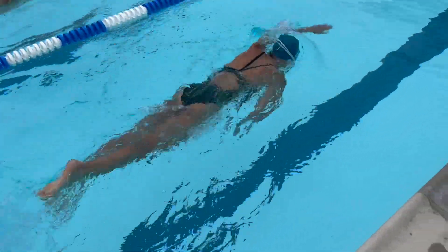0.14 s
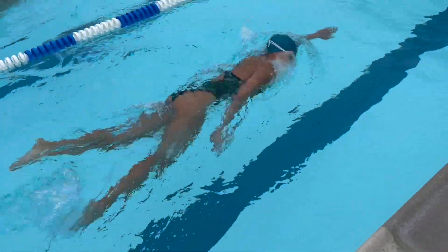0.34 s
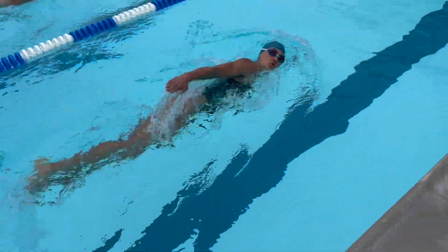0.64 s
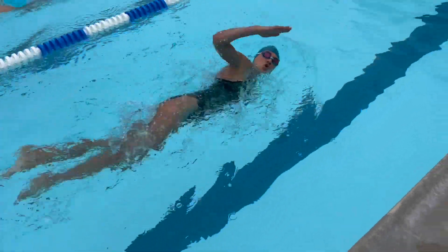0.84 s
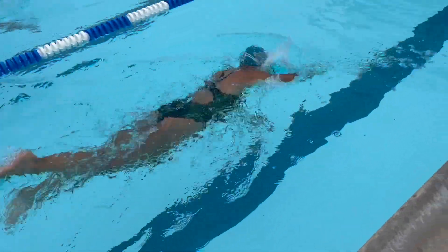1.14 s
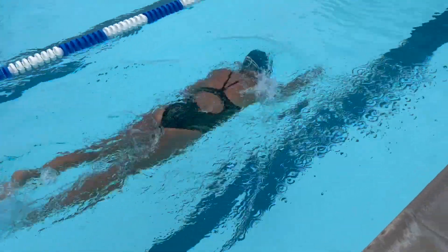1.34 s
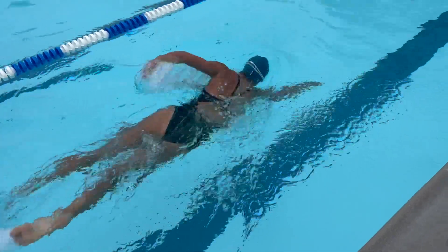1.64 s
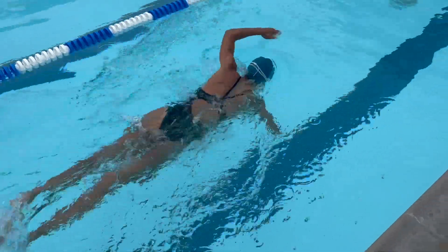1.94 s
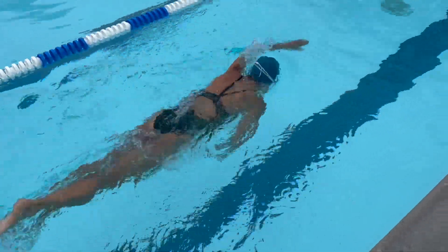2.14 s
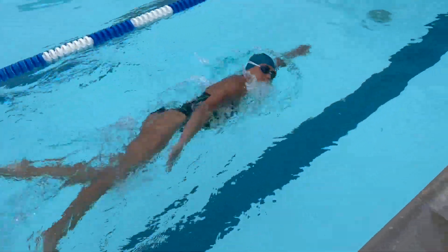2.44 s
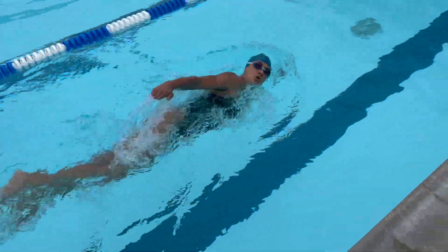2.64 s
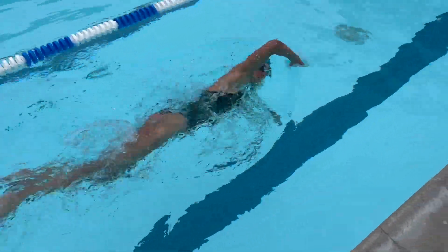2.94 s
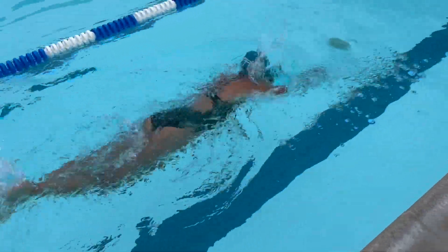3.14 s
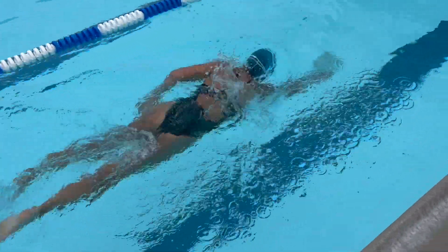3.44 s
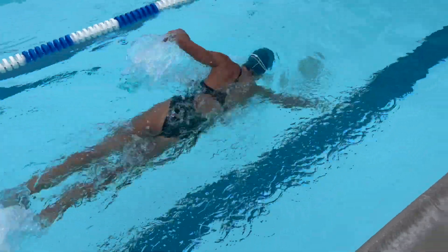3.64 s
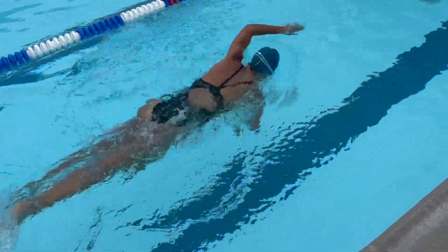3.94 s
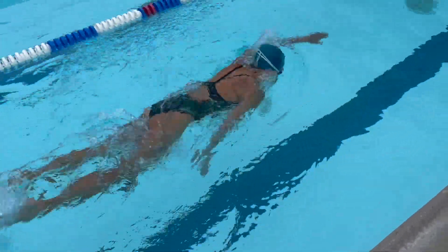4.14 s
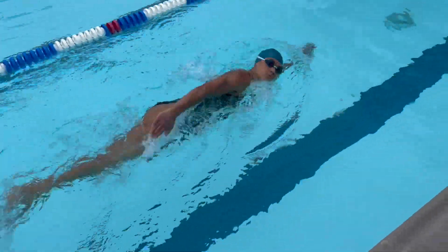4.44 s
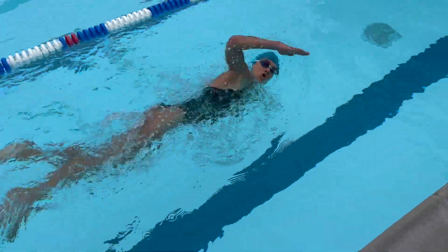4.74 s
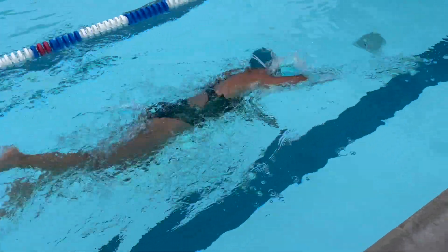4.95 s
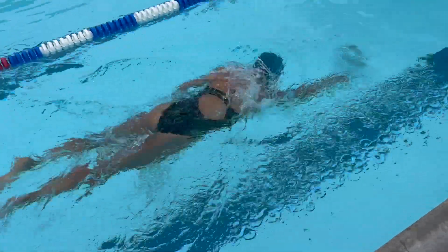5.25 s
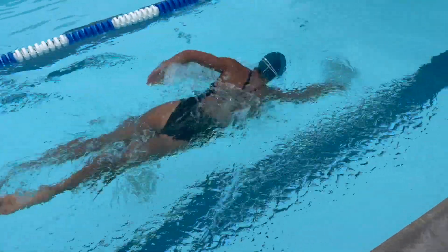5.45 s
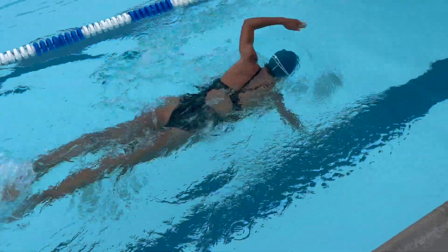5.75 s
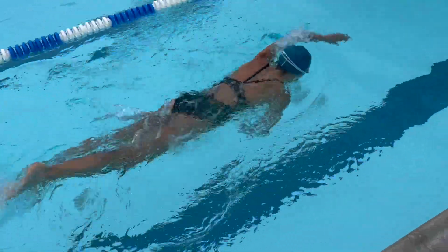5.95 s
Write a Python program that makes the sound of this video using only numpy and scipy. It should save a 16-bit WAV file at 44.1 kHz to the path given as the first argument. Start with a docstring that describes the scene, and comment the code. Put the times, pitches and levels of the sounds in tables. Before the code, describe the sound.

A swimmer does front crawl close by in an outdoor pool, water gurgling, splashing and plunking while a low propeller drone fades away.

```python
"""Outdoor pool, from the deck: a swimmer does front crawl.
Hands slap (noise bursts); kicks and arm strokes churn air into clouds of ringing bubbles, gulps and plunks.
Drops tick and ring on the water, and spray fizzes above.
A low engine drone, like a propeller plane (summed orders), fades into the distance over an outdoor rumble."""
import sys
import numpy as np
from scipy import signal
from scipy.fft import rfft, irfft, next_fast_len
from scipy.io import wavfile
from scipy.ndimage import uniform_filter1d, map_coordinates

SR = 44100
rng = np.random.default_rng(int(sys.argv[2]) if len(sys.argv) > 2 else 0)


def generate_wav(signal):
    """Clip the signal to [-1, 1] and save it as 16-bit WAV at the path in sys.argv[1]."""
    frames = np.transpose(np.atleast_2d(signal))
    scaled = np.clip(frames, -1, 1) * 32767
    pcm = np.round(scaled).astype(np.int16)
    wavfile.write(sys.argv[1], SR, pcm)


N = 268128


def amp(db):
    """Decibels to gain."""
    return 10 ** (np.asarray(db) / 20)


def unit(x):
    """Scale to rms 1."""
    return x / np.sqrt(np.mean(x ** 2) + 1e-20)


def curves(rows):
    """One value per sample for each column after the time."""
    s, *columns = np.transpose(rows)
    return [np.interp(np.arange(N) / SR, s, column) for column in columns]


def wobble(rate_hz):
    """Smooth random curve, rate_hz knots a second."""
    knots = rng.standard_normal(int(N * rate_hz / SR) + 4)
    return map_coordinates(knots, [np.arange(N) * rate_hz / SR])


def filtered(x, response):
    """x times a response of frequency."""
    m = next_fast_len(N + 8192)
    spectrum = rfft(x, m) * response(np.fft.rfftfreq(m, 1 / SR))
    return irfft(spectrum, m)[..., :N]


def coloured(x, points):
    """x through a spectrum of (f/Hz, level/dB) points, interpolated in log frequency."""
    f, db = np.transpose(points)
    return filtered(x, lambda hz: amp(np.interp(np.log(hz + 1), np.log(f), db)))


def one_pole(x, cutoff_hz):
    """One-pole lowpass, not normalised in gain."""
    return signal.lfilter([1], [1, -np.exp(-2 * np.pi * cutoff_hz / SR)], x)


def add(track, s, sound):
    """Mix a sound into a track at s seconds."""
    start = max(0, round(s * SR))
    track[start:start + len(sound)] += sound[:max(0, N - start)]


# stereo width: f/Hz, side gain/dB
SIDE_WIDTH = [(60, -11.5), (140, -7.5), (350, -11.5), (700, -5), (1100, -3), (1500, 6), (1850, -13),
              (2800, -2), (4500, -6.5), (5600, -1.5), (6800, -14), (13000, -95)]


def stereo(mid, side):
    """Left and right from mid and side; the width depends on frequency."""
    side = coloured(side, SIDE_WIDTH)
    return np.array([mid + side, mid - side])


def poolside(x, decay_s=0.014):
    """The moving surface scatters a sound sideways, by a new path every fifth of a second."""
    t = np.arange(SR // 20) / SR
    side, size = np.zeros(N), SR // 5
    for start in range(0, N, size):
        path = rng.standard_normal(len(t)) * amp(-60 * t / decay_s)
        path = path / np.linalg.norm(path)
        add(side, start / SR, signal.fftconvolve(x[start:start + size], path))
    return stereo(x, side)


def scene():
    """The swimmer in front, the drone and rumble all around."""
    return strokes() + slaps() + gulps() + drops() + plunks() + drone() + rumble()


# bubble and spray spectra: f/Hz, relative level/dB (per Hz)
CHURN_SPECTRUM = [(90, -19), (170, 4.5), (250, 0), (340, 0.5), (480, -2.5), (750, -5.5), (1000, -28),
                  (2000, -51)]
SPLASH_SPECTRUM = [(400, -6.5), (750, -4.5), (1080, 0.5), (1600, -5.5), (2050, -4.5), (2800, -9.5),
                   (3600, -18), (6000, -64)]
SPRAY_SPECTRUM = [(1500, -3), (2800, -4), (3500, 0.5), (4700, 0.5), (5600, -4), (7000, -0.5), (9000, -2.5),
                  (11500, -1), (13500, -5), (15600, -20)]


def strokes():
    """Large bubbles gurgle under the kicks, small ones splash, and droplets fizz above them."""
    churn_db, splash_db, spray_db = stirring()
    slosh = wobble(35)  # sheets of water break unevenly
    large = bubbles(rate_hz=360, low_hz=200, high_hz=950, cycles=22, spread_db=2.4, rise=.08, clump_db=3)
    small = bubbles(rate_hz=1100, low_hz=700, high_hz=3400, cycles=38, spread_db=2.6, rise=.015, clump_db=3)
    tiny = bubbles(rate_hz=1900, low_hz=2600, high_hz=15000, cycles=34, spread_db=3.8, rise=.025, clump_db=3)
    churn = froth(large, CHURN_SPECTRUM, wash_db=-1.5)
    splash = patchy(froth(small, SPLASH_SPECTRUM, wash_db=-2), depth_db=2.2)
    spray = froth(tiny, SPRAY_SPECTRUM, wash_db=2)
    churn = churn * amp(churn_db + slosh)
    splash = splash * amp(splash_db + 0.35 * slosh)
    spray = spray * amp(spray_db + 1.4 * slosh + 0.88 * wobble(500))
    return churn + splash + spray


# flutter kick: t/s, vigour/dB
KICK_VIGOUR = [(0, 2), (.13, -0.5), (.45, 2), (.95, -1), (1.6, 2.24), (2.0, 1.5), (2.16, 1), (2.9, 1),
               (3.4, 2.5), (4.0, 1), (4.4, 0.5), (4.8, 1.66), (5.2, 3), (5.32, 1.1), (5.6, 3), (5.9, 1.5),
               (5.99, -1), (6.08, 2)]
# wake kept boiling by the kick, before vigour: churn level/dB, splash level/dB, spray level/dB
WAKE_LEVELS = (-32.5, -38, -46)
# arm plunges in and drags air under:
# t/s, splash gain/dB, rise/s, hold/s, fall/s, extra churn/dB, extra spray/dB
ARM_ENTRIES = [(.26, 1.5, 0.05, 0.088, 0.1, 1, -1.5), (1.1, 1.5, 0.22, 0.15, 0.099, -4.5, -4),
               (2.3, 2.5, 0.049, 0.16, 0.11, -3, -3.5), (3.05, 0.5, 0.064, 0.15, 0.14, -3, -0.5),
               (4.16, -1.5, 0.11, 0.12, 0.23, 1.5, 2.5), (5.065, 4.5, 0.079, 0.032, 0.02, -3, -1),
               (6.045, 1, 0.026, .04, .2, -2, -6)]
# arm pushes out past the hip and sheds water: same columns
ARM_EXITS = [(.58, -3, 0.058, 0.23, 0.11, 4, -1.5), (1.74, -0.5, 0.05, 0.035, 0.29, -2, 2),
             (2.6, -2.5, 0.05, 0.12, 0.36, -21, -1), (3.62, 3, 0.039, 0.17, 0.22, -4.5, -0.5),
             (4.55, -7, 0.083, 0.1, 0.33, 2, 1.5), (5.495, -3, 0.039, 0.37, 0.11, -2.5, 1)]
# base surge levels: churn level/dB, splash level/dB, spray level/dB
ENTRY_LEVELS = (-31, -38, -40)
EXIT_LEVELS = (-29.5, -36.5, -38.5)


def stirring():
    """Levels in dB of churn, splash and spray: the arm strokes over the wake of the kick."""
    kick_db, = curves(KICK_VIGOUR)
    layer_swing = [1, 1, 2.27]  # spray swings wider than gurgle
    wake = amp(np.array(WAKE_LEVELS)[:, None] + np.outer(layer_swing, kick_db))
    power = wake ** 2 + surges(ARM_ENTRIES, ENTRY_LEVELS) + surges(ARM_EXITS, EXIT_LEVELS)
    return 10 * np.log10(power)


def surges(rows, layers_db):
    """Power of churn, splash and spray: each arm movement swells, holds and settles."""
    t, power = np.arange(N) / SR, np.zeros((3, N))
    for s, db, rise_s, hold_s, fall_s, churn_db, spray_db in rows:
        rise = (np.minimum(t - s, 0) / rise_s) ** 2
        fall = np.maximum(t - s - hold_s, 0) / fall_s
        swell = np.exp(-rise - fall)
        gains = amp(np.add(layers_db, [db + churn_db, db, db + spray_db]))
        power += np.outer(gains, swell) ** 2
    return power


def bubbles(rate_hz, low_hz, high_hz, cycles, spread_db, rise, clump_db):
    """Clumped bubbles each die by 35 dB in few or many cycles, rising in pitch as they near the surface."""
    when, size, strength, life, phase = rng.random((int(rate_hz * N / SR), 5)).T
    births = np.cumsum(amp(clump_db * wobble(70)))
    start = np.searchsorted(births, when * births[-1])
    hz = low_hz * (high_hz / low_hz) ** size
    length = (cycles * 2 ** (3 * life - 2) / hz * SR).astype(int) + 2  # samples; 1/4 to 2 x cycles
    strength_db = spread_db * np.minimum(-np.log(1 - strength), 4)
    gain = amp(strength_db) * np.sqrt(hz) * 2 ** -life
    # all bubbles end to end: one value per sample of each
    each = lambda value: np.repeat(value.astype(np.float32), length)
    first = np.repeat(np.cumsum(length) - length, length)
    k = (np.arange(length.sum()) - first).astype(np.float32)
    age, turns = k / each(length), k * each(hz / SR)
    ring = np.sin(2 * np.pi * (turns * (1 + rise * age / 2) + each(phase)))
    swell = np.exp(-4 * age) * (1 - np.exp(-2 * turns))
    place = (each(start) + k).astype(int)
    return unit(np.bincount(place, each(gain) * ring * swell, N)[:N])


def froth(cloud, spectrum, wash_db):
    """Distinct bubbles over the wash of countless fainter ones, with a mid of rms 1."""
    pair = poolside(unit(coloured(cloud, spectrum)))
    wash = stereo(*unit(coloured(rng.standard_normal((2, N)), spectrum)))
    pair = pair + amp(wash_db) * wash
    return pair / np.std(pair.mean(axis=0))


def patchy(pair, depth_db):
    """A drifting cloud of bubbles favours now these pitches, now those."""
    z = signal.stft(pair, nperseg=1024)[2]
    field = rng.standard_normal(z.shape[1:])
    field = uniform_filter1d(field, size=3, axis=0)  # across frequency
    field = uniform_filter1d(field, size=9, axis=1)  # across time
    out = signal.istft(z * amp(depth_db * unit(field)), nperseg=1024)[1][:, :N]
    return out / np.std(out.mean(axis=0))


# hands, arms and feet smack the surface: t/s, relative level/dB, envelope scale/s, lowpass f/Hz
SURFACE_SLAPS = [(0.0224, -18.5, 0.0041, 12000), (.174, -20, 0.0023, 12000), (1.0714, -19, .003, 13000),
                 (1.075, -24, 0.01, 6000), (1.223, -22, 0.018, 4000), (1.25, -20, 0.019, 3000),
                 (1.471, -21, 0.0056, 12000), (1.578, -26, .006, 3500), (1.795, -25, .004, 4000),
                 (1.808, -27, 0.0026, 14000), (1.882, -21.5, .004, 7000), (2.294, -22, .002, 500),
                 (2.718, -24, 0.014, 11000), (3.008, -14, 0.0067, 7000), (3.188, -20, 0.017, 3500),
                 (3.611, -25, 0.015, 4000), (3.789, -20.5, 0.012, 10000), (4.188, -24, 0.022, 1200),
                 (4.902, -13, 0.0035, 12000), (4.911, -19, .005, 10000), (5.08, -23, 0.02, 1500),
                 (5.354, -27, .005, 2500), (5.459, -24, .002, 13000), (5.89, -18, 0.0073, 14000),
                 (6.05, -28, .012, 3000)]
# crackle of torn water: f/Hz, gain/dB
CRACKLE_SPECTRUM = [(100, -25), (300, -8), (700, 0), (3500, 0), (7000, -1), (12500, 0), (15500, -3)]


def slaps():
    """A flat hand tears the surface into bright crackle; a whole arm makes a longer, duller splash."""
    track = np.zeros(N)
    for s, db, scale_s, bright_hz in SURFACE_SLAPS:
        u = np.arange(SR // 8) / SR / scale_s
        burst = unit(one_pole(rng.standard_normal(len(u)), bright_hz))
        swell = 2 * u * np.exp(1 - 2 * u)  # peaks at half the scale
        add(track, s, amp(db - 9) * swell * burst)
    crackle = track * amp(2.5 * wobble(900))
    return poolside(coloured(crackle, CRACKLE_SPECTRUM))


# hollows collapse into bubble clusters: t/s, relative level/dB, centre f/Hz, time scale/s
BUBBLE_GULPS = [(0.332, -19, 660, .03), (1.123, -15, 660, 0.0047), (1.17, -21, 535, 0.015),
                (1.246, -31, 1680, 0.012), (1.74, -17, 700, 0.026), (2.296, -9.5, 290, 0.014),
                (2.42, -28, 1700, 0.0092), (2.503, -14.5, 430, .008), (3.013, -28, 650, .014),
                (3.087, -21, 800, 0.015), (3.199, -21, 1520, 0.017), (3.617, -19, 1000, 0.014),
                (3.649, -18, 1100, 0.0055), (3.753, -28, 1300, 0.026), (3.838, -25, 2090, 0.017),
                (4.077, -9.5, 556, 0.0065), (4.16, -13, 560, 0.023), (4.607, -14, 252, 0.04),
                (5.085, -15, 760, .016), (5.097, -20.5, 1600, 0.016), (5.41, -15, 650, 0.0096),
                (5.436, -19, 800, .008), (5.526, -19, 320, 0.023), (5.574, -18, 945, 0.013),
                (5.654, -17.5, 350, .04), (5.667, -26, 1150, 0.021), (5.75, -18.5, 1000, 0.014),
                (6.037, -14.5, 360, .025), (6.048, -21, 2200, 0.02)]


def gulps(count=16, half_spread_octaves=0.74, ring_cycles=8):
    """Each collapsing hollow sheds a quick run of bubbles of similar size."""
    track, t = np.zeros(N), np.arange(SR // 8) / SR
    for s, db, centre_hz, scale_s in BUBBLE_GULPS:
        when, size, strength = rng.random((3, count, 1))
        delay_s = 2 * scale_s * ((np.arange(count)[:, None] + when) / count) ** 2
        hz = centre_hz * 2 ** (half_spread_octaves * (2 * size - 1))
        turns = np.maximum(t - delay_s, 0) * hz
        ring = np.sin(2 * np.pi * turns) * np.exp(-4 * turns / ring_cycles)
        gain = (2 * strength - 1) * np.exp(-delay_s / scale_s / 2)  # later bubbles weaker
        cluster = np.sum(gain * ring, axis=0)
        rms = np.sqrt(np.sum(cluster ** 2) / (2 * scale_s * SR))
        add(track, s, amp(db - 15) * cluster / rms)
    return poolside(track)


# single drops and the bubbles they trap: t/s, relative level/dB, starting f/Hz, tick-to-ring ratio
WATER_DROPS = [(.175, -24, 5300, 1.2), (.787, -18, 3430, .5), (1.0766, -13, 3500, 1),
               (1.124, -13, 2280, 1.1), (1.224, -17.5, 2230, .4), (1.233, -18, 6060, 1.2),
               (1.242, -14, 3680, 1.2), (1.255, -24, 4000, 1.2), (1.333, -23, 1430, .3),
               (1.3355, -12, 12000, .4), (1.368, -24, 2480, .2), (1.407, -21, 3780, .3),
               (1.469, -16, 5350, .8), (1.557, -22, 1960, .2), (1.832, -23, 1540, .3),
               (2.043, -27, 2400, .2), (2.105, -21, 4970, .3), (2.1315, -19, 1940, 0.25),
               (2.263, -15, 6800, .5), (2.3595, -8, 5580, 2), (2.568, -25, 1550, .1),
               (2.928, -22, 1950, .2), (3.011, -12.5, 3600, 1.2), (3.031, -23, 1940, .2),
               (3.119, -20, 6350, .4), (3.205, -19, 1550, .9), (3.622, -17, 2750, .6),
               (3.792, -18, 7500, 1.2), (3.658, -16, 3780, .3), (3.840, -18, 2260, .5),
               (4.233, -24, 1370, .1), (4.3005, -15, 4500, .7), (4.904, -19, 2650, 1),
               (4.9045, -19, 4650, 1), (4.955, -19.5, 2200, .2), (4.963, -19, 2400, .4),
               (5.065, -17, 4400, 1), (5.086, -14, 7400, 1), (5.109, -16, 1970, .8),
               (5.480, -18.5, 1195, .2), (5.818, -14, 2020, 1.1), (5.8518, -17, 2300, .7)]


def drops():
    """Each drop ticks on the water and rings one tiny bubble of rising pitch."""
    track, t = np.zeros(N), np.arange(SR // 30) / SR
    for s, db, hz, impact in WATER_DROPS:
        ring = np.sin(2 * np.pi * hz * t * (1 + 4 * t)) * amp(-60 * t * hz / 32)  # -60 dB in 32 cycles
        tick = impact * rng.standard_normal(len(t)) * amp(-60 * t / .004)
        tick = one_pole(tick, hz) * (1 - np.exp(-2 * np.pi * hz / SR))  # bigger drops tick duller
        onset = 1 - np.exp(-t / .0007)
        add(track, s, amp(db - 1.5) * (ring + tick) * onset)
    return poolside(track)


# air pockets opened by kicks and pulls: t/s, peak level/dB, start f/Hz, end f/Hz, glide time/s
AIR_PLUNKS = [(.235, -20, 309, 174, 0.043), (.775, -18.5, 234, 112, 0.066),
              (1.794, -19.5, 940, 1020, 0.0063), (2.289, -17.5, 296, 345, 0.025),
              (2.506, -20, 450, 556, 0.0047), (3.479, -7, 233, 93, 0.014), (3.758, -21, 303, 350, 0.014),
              (4.17, -19, 127, 100, 0.028), (4.192, -16.5, 334, 190, 0.019), (4.476, -18, 220, 169, 0.021),
              (4.509, -22, 424, 433, 0.025), (4.62, -18, 145, 87, 0.041), (5.05, -13, 153, 97.5, 0.013),
              (5.351, -17, 140, 88, 0.012), (5.439, -17, 655, 520, 0.0036), (5.526, -26, 311, 335, .032),
              (5.654, -23.5, 325, 380, 0.051), (5.772, -17, 151, 80, 0.013), (5.956, -16, 95, 70, 0.02)]


def plunks():
    """An air pocket's note falls as it widens, or rises as it closes."""
    track, t = np.zeros(N), np.arange(SR // 5) / SR
    for s, db, start_hz, end_hz, glide_s in AIR_PLUNKS:
        u = t / glide_s
        hz = start_hz + (end_hz - start_hz) * np.minimum(u, 1)
        swell = 2 * u * np.exp(-(2 * u) ** 1.3)
        note = np.sin(2 * np.pi * np.cumsum(hz) / SR)
        add(track, s, amp(db) * swell / swell.max() * note)
    return track


# engine: t/s, firing rate f/Hz
FIRING_RATE = [(0, 73.3), (.5, 73), (1.5, 72.05), (2.2, 71.6), (3, 71), (4.2, 70.55), (6.08, 70.1)]
# propeller tone, fading into the distance: t/s, relative level/dB
TONE_LEVEL = [(0.1, -15.5), (0.55, -21), (1.15, -18), (1.6, -21), (2.3, -25), (2.85, -27.5), (3.3, -24),
              (3.8, -23), (4.4, -28.5), (5.2, -30), (6.0, -31.5)]
# other orders together: t/s, relative level/dB
ORDERS_LEVEL = [(0, -35.5), (.7, -35.5), (1.25, -33.5), (1.9, -38), (2.5, -39.5), (3, -43.5), (3.7, -37.5),
                (4.6, -47.5), (6.08, -52)]
# other orders singly: multiple of firing rate, relative level/dB, slope/(dB/s)
ENGINE_ORDERS = [(1, 0, 0), (2.25, -6, -3), (3, 4.5, -1.3), (3.75, -1, 0), (4, 5.3, -.7), (5, -.3, -1.8),
                 (5.5, -9, -1), (6, -4, .1), (7, -8.3, -.2), (14, -14.5, .5)]


def drone(skew_rad=.25):
    """Propeller tone on the second order leads; moving air makes orders waver and drift between channels."""
    hz, = curves(FIRING_RATE)
    tone_db, = curves(TONE_LEVEL)
    orders_db, = curves(ORDERS_LEVEL)
    t, turn_rad = np.arange(N) / SR, 2 * np.pi * np.cumsum(hz) / SR
    drift = lambda: skew_rad * np.outer([1, -1], unit(wobble(2.03)))  # opposite phase left and right
    tone = amp(tone_db + .25 * wobble(7)) * np.sin(2 * turn_rad + .03 * wobble(12) + drift())
    rest = 0
    for order, db, slope_db_per_s in ENGINE_ORDERS:
        gain = amp(db + slope_db_per_s * t + .7 * wobble(3))
        rest = rest + gain * np.sin(order * turn_rad + drift())
    return np.sqrt(2) * (tone + amp(orders_db) * rest)


# rumble: t/s, relative level/dB
RUMBLE_LEVEL = [(0, -25), (0.27, -21.5), (0.48, -29.5), (0.78, -19.5), (1.17, -30.5), (1.45, -27.5),
                (1.82, -20.5), (2.38, -38.5), (2.62, -27.5), (2.9, -30), (3.28, -30), (3.7, -33),
                (4.1, -27), (4.62, -24.5), (4.85, -25.5), (5.3, -27), (5.58, -33), (6.0, -30.5)]
# rumble spectrum: f/Hz, relative level/dB (per Hz)
RUMBLE_SPECTRUM = [(20, -32), (32, -17), (48, -2), (68, 8), (95, 0.5), (130, -1), (190, -7), (260, -16.5),
                   (450, -51)]


def rumble():
    """Low outdoor rumble, as coloured noise that swells and sinks."""
    db, = curves(RUMBLE_LEVEL)
    noise = unit(coloured(rng.standard_normal((2, N)), RUMBLE_SPECTRUM))
    return amp(db + 1.5) * stereo(*noise)


# two microphone ports: f/Hz, phase lag of left behind right/turns
PORT_LAG = [(6700, 0), (8300, .24), (9850, .5), (11400, .75), (13000, 1), (14400, 1.25), (15700, 1.5)]
# channel balance: f/Hz, left minus right/dB
PORT_LEAN = [(100, 0), (400, -0.5), (700, -2.5), (1290, -2), (2380, 1.5), (4400, 1.5), (8000, 0)]


def record(dry, top_hz=15700):
    """Two spaced ports hear the treble out of step; nothing passes above the band limit."""
    ears = np.array([[1], [-1]]) / 2  # half of each difference per channel
    lag = lambda hz: np.exp(-2j * np.pi * ears * np.interp(hz, *np.transpose(PORT_LAG)))
    lean = lambda hz: amp(ears * np.interp(hz, *np.transpose(PORT_LEAN)))
    return filtered(dry, lambda hz: lag(hz) * lean(hz) * (hz < top_hz))


dry = scene()
out = record(dry)
generate_wav(out)
```